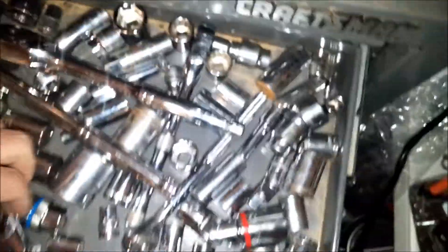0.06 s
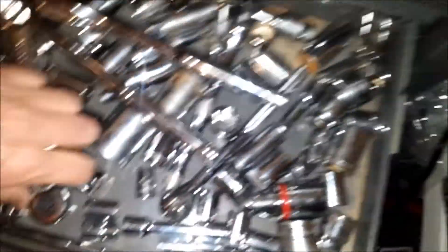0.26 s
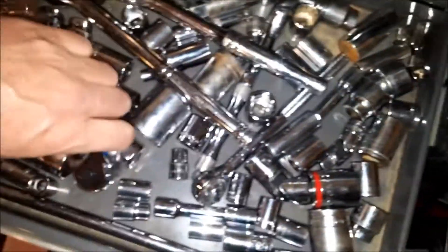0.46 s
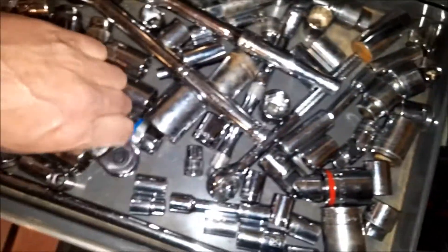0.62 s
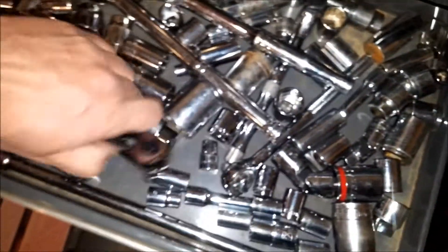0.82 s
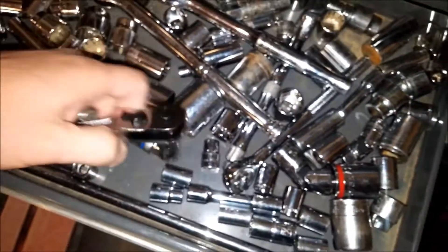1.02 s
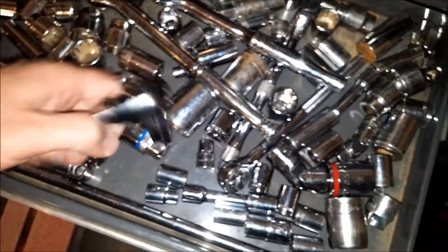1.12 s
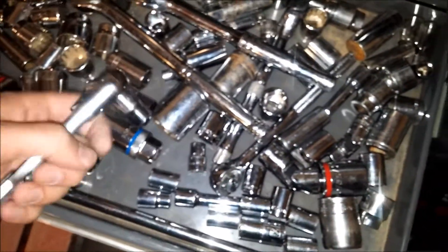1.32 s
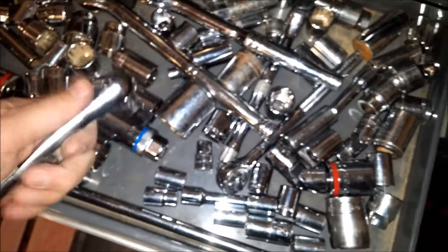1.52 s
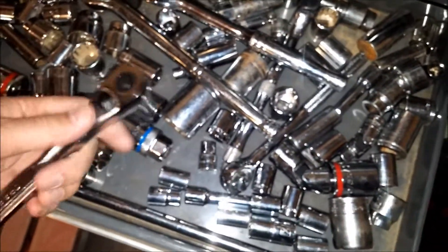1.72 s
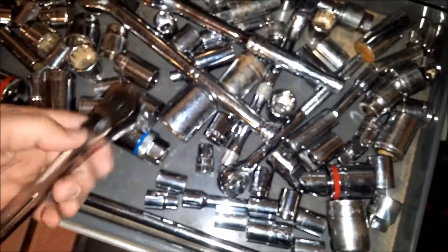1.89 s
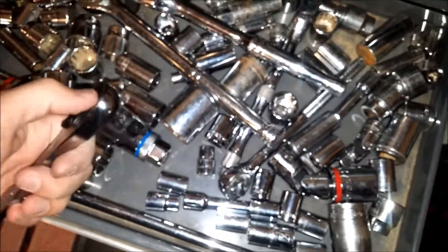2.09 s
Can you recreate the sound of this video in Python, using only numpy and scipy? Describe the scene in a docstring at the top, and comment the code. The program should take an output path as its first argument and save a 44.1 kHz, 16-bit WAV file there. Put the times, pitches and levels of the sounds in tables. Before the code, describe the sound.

Steel sockets clink and clatter as a hand rummages in a toolbox drawer, then faint ticks.

```python
"""A hand rummages among steel sockets in a toolbox drawer and pulls out a ratchet handle.
For the first second the pile scrapes in tiny slips and clacks, ringing the drawer floor and a long bar.
At 0.4 s a heavy knock thumps the case and a large socket pings; a small one pings at 0.7 s.
From 1.1 s the lifted handle slides through the hand, ticking faintly, its loose head chattering.
Throughout, a small garage rings briefly over faint rumble and hiss."""
import sys
import numpy as np
from scipy import signal
from scipy.fft import rfft, irfft, next_fast_len
from scipy.io import wavfile
from scipy.ndimage import uniform_filter1d

SR = 44100
rng = np.random.default_rng(int(sys.argv[2]) if len(sys.argv) > 2 else 0)


def write(x):
    x = np.atleast_2d(x).T
    wavfile.write(sys.argv[1], SR, np.round(np.clip(x, -1, 1) * 32767).astype(np.int16))


N = 94815
TIME_S = np.arange(N) / SR
CUTOFF_HZ, SLIP_SPREAD_DB = 15900, 5.5

# ratchet handle modes: f/Hz, level/dB, t60/s
HANDLE_MODES = [(2910, -11, .1), (3130, -13, .09), (3270, -11, .08), (3945, -10, .05), (4197, 0, .08),
                (4340, -11, .07), (5670, -15, .08), (5890, -15, .08), (8010, -5, .03), (8112, -1, .095),
                (9119, -15, .05)]
# envelope of the handle sliding in the hand: t/s, level/dB
SLIDE_ENVELOPE = [(1.101, -70.5), (1.23, -73.5), (1.249, -57.5), (1.301, -70), (1.34, -78), (1.53, -74),
                  (1.597, -55.5), (1.63, -83), (1.692, -74.5), (1.719, -46.5), (1.8, -78.5), (1.86, -65.5),
                  (1.91, -83), (2.08, -75), (2.14, -68.5)]


def from_db(db):
    """Decibels to gain."""
    return 10 ** (np.asarray(db) / 20)


def at_hz(points, hz):
    """Interpolate a table over log frequency."""
    table_hz, values = np.transpose(points)
    return np.interp(np.log(np.maximum(hz, 1)), np.log(table_hz), values)


def rfft_hz(size):
    """FFT bin frequencies."""
    return np.arange(size // 2 + 1) * SR / size


def filtered(x, gain):
    """Apply gain(hz) to the spectrum."""
    size = next_fast_len(N + SR // 4)
    return irfft(rfft(x, size) * gain(rfft_hz(size)), size)[..., :N]


def stereo_pair(mid, side, hz):
    """Left and right from two independent parts, alike in the bass, less so higher up."""
    # left-right likeness: f/Hz, correlation
    likeness = [(600, .95), (1200, .8), (3000, .1), (12000, .17)]
    correlation = at_hz(likeness, hz)
    mid = mid * np.sqrt((1 + correlation) / 2)
    side = side * np.sqrt((1 - correlation) / 2)
    return np.array([mid + side, mid - side])


def room_air(rms_db=-66.5):
    """Steady rumble and hiss."""
    # noise spectrum: f/Hz, relative density/dB
    density = [(25, -18.5), (48, -6), (110, -0.5), (170, -3.5), (260, -6.5), (600, -12.5), (1230, -14),
               (2840, -17), (4250, -21), (6400, -22), (9000, -26.5), (15500, -27)]
    hz = rfft_hz(N)
    white = stereo_pair(*rfft(rng.standard_normal((2, N))), hz)
    noise = irfft(white * from_db(at_hz(density, hz)), N)
    return from_db(rms_db) * noise / noise.std()


def garage_reverb(x, t60_s=0.45, build_s=0.012, level_db=-21.5):
    """Diffuse reflections build quickly and die away."""
    # tail spectrum: f/Hz, level/dB
    colour = [(170, 12.5), (500, -6.5), (1200, 0.5), (3000, -0.5), (7000, -5.5), (14000, -8)]
    envelope = from_db(-60 * TIME_S / t60_s) * (1 - np.exp(-TIME_S / build_s))
    tail = rng.standard_normal((2, N)) * envelope
    tail /= np.sqrt(np.sum(tail ** 2) / 2)
    tail = filtered(tail, lambda hz: from_db(level_db + at_hz(colour, hz)))
    return signal.fftconvolve(x, tail, axes=1)[:, :N]


def drawer_direction(hz, left_lead_s=0.00016, lead_top_hz=1450):
    """Complex left and right gains for a source a little to the left."""
    # balance: f/Hz, left minus right/dB
    balance = [(200, 2.5), (700, -0.5), (1300, 1.5), (2400, 0), (5500, -1.5), (7200, 1), (9300, -12),
               (11500, -6), (13000, -0.5)]
    split = np.array([[0.5], [-0.5]])
    phase_rad = 2 * np.pi * np.minimum(hz, lead_top_hz) * left_lead_s
    return from_db(split * at_hz(balance, hz)) * np.exp(1j * split * phase_rad)


def struck(hits, modes, spread_db=1.5):
    """Blows (t/s, level/dB, optional tilt/dB per octave) ring damped modes, a bit differently each time."""
    hit_s, hit_db, *tilt = np.transpose(hits)
    starts = (hit_s * SR).astype(int)
    octaves = np.log2(np.array(modes)[:, 0])
    scatter_db = spread_db * rng.standard_normal((len(hit_s), len(modes)))
    out = 0
    for k, (hz, mode_db, t60_s) in enumerate(modes):
        tilt_db = sum(tilt) * (octaves[k] - octaves.mean())
        force = np.bincount(starts, from_db(hit_db + mode_db + tilt_db + scatter_db[:, k]), N)[:N]
        radius, step_rad = from_db(-60 / (t60_s * SR)), 2 * np.pi * hz / SR
        poles = [1, -2 * radius * np.cos(step_rad), radius ** 2]
        out += (-1) ** k * signal.lfilter([0, np.sin(step_rad)], poles, force + 1e-18)
    return out


def pile_modes(count=700, rise_s=0.00024, crack_s=0.003, crack_db=-10):
    """Crowded modes of touching sockets: frequencies and waveforms, each a crack, then a short ring."""
    # pile decay: f/Hz, t60/s
    decay_times = [(400, 0.053), (1500, 0.075), (4000, 0.1), (11000, 0.079)]
    t = TIME_S[:SR // 7]
    hz = np.linspace(100, CUTOFF_HZ, count) + rng.uniform(-10, 10, count)
    t60_s = at_hz(decay_times, hz) * np.exp(0.12 * rng.standard_normal(count))
    attack = (1 + from_db(crack_db) * np.exp(-t / crack_s)) * (1 - np.exp(-t / rise_s))
    decay = from_db(-60 * np.outer(1 / t60_s, t))
    rings = np.cos(2 * np.pi * np.outer(hz, t)) * decay * attack
    return hz, rings.astype(np.float32)


def pile_colour_db(hz, body_db, treble_db):
    """Contacts near the drawer floor have more body, hard ones more treble."""
    # pile spectrum: f/Hz, level/dB
    spectrum = [(120, -11.5), (250, 3), (380, -2), (560, 3), (800, -0.5), (1200, 6), (2000, 0.5),
                (3200, -5), (5000, -4), (7000, -3.5), (10000, 0), (12500, -7.5), (15500, -16)]
    shelves = [(1000, body_db), (2200, 0), (4500, 0), (9000, treble_db)]
    return at_hz(spectrum, hz) + at_hz(shelves, hz)


def contact(hz, rings, colour_db, cluster_spread_db=2.2):
    """One contact drives every mode by a random amount, favouring a few clusters."""
    clusters = uniform_filter1d(rng.standard_normal(len(hz)), size=7)
    favour = from_db(cluster_spread_db * clusters / clusters.std())
    favour /= np.sqrt(np.mean(favour ** 2))
    drive = stereo_pair(*rng.standard_normal((2, len(hz))), hz) * favour * from_db(colour_db)
    return drive.astype(np.float32) @ rings


def scrape(hz, rings, envelope, colour_db, points, slips_per_s=350):
    """Steel slides in tiny slips, shared among several contact points."""
    level = from_db(np.interp(TIME_S, *np.transpose(envelope), left=-np.inf, right=-np.inf))
    out = 0
    for _ in range(points):
        slipping = rng.random(N) < slips_per_s / points / SR
        strength = from_db(SLIP_SPREAD_DB * rng.standard_normal(N).clip(-2, 2))
        force = slipping * strength * rng.choice([-1, 1], N) * level
        out += signal.fftconvolve([force], contact(hz, rings, colour_db), axes=1)[:, :N]
    return out


def handle_slide(hz, rings, level_db=-26):
    """The handle scrapes faintly through the hand."""
    # slide spectrum: f/Hz, level/dB
    colour = [(400, -18.5), (1000, -3.5), (3000, 2.5), (4500, 5), (7000, -2.5), (10000, -9.5),
              (15000, -41.5)]
    return scrape(hz, rings, SLIDE_ENVELOPE, level_db + at_hz(colour, hz), points=4)


def head_chatter(count=300, re_slide_db=-16, tilt_db_per_oct=-13):
    """The loose head of the sliding handle taps the handle's modes."""
    hit_s = rng.uniform(SLIDE_ENVELOPE[0][0], SLIDE_ENVELOPE[-1][0], count)
    hit_db = np.interp(hit_s, *np.transpose(SLIDE_ENVELOPE)) + re_slide_db
    hit_db += SLIP_SPREAD_DB * rng.standard_normal(count).clip(-2, 2)
    return struck(np.column_stack([hit_s, hit_db, np.full(count, tilt_db_per_oct)]), HANDLE_MODES)


def handle_ticks():
    """Single light blows ring the handle."""
    # blows: t/s, level/dB, tilt/dB per octave
    hits = [(.613, -34, -10.5), (1.0565, -48, -1), (1.2856, -59, -4.5), (1.312, -58, -4),
            (1.581, -49.5, -4), (1.7195, -33.5, 5.5), (1.7235, -44.5, 5), (1.748, -61, -9),
            (1.779, -54, -6), (1.858, -53, -12), (2.129, -70, -8)]
    return struck(hits, HANDLE_MODES)


def pile_shift(hz, rings, level_db=-23):
    """Sockets slide over each other."""
    # sliding envelope: t/s, level/dB
    envelope = [(0, -47.5), (.05, -53), (0.131, -44.5), (0.156, -58.5), (0.192, -53), (0.213, -33.5),
                (.3, -36), (.4, -41), (.52, -44.5), (.56, -57), (.64, -49.5), (.77, -45), (0.821, -56.5),
                (.98, -59), (1.101, -74)]
    colour_db = level_db + pile_colour_db(hz, body_db=0.5, treble_db=-14)
    return scrape(hz, rings, envelope, colour_db, points=8)


def rocking_bar():
    """A long bar rocks on the pile and rings."""
    # bar modes: f/Hz, level/dB, t60/s
    modes = [(883, 2, .083), (1260, -10, .09), (1563, -7.5, .11), (1666, -10, .2), (2050, -12, .25)]
    # blows: t/s, level/dB
    hits = [(.0275, -36), (.4145, -29), (.7135, -34.5), (.765, -43), (.831, -43), (.929, -45.5),
            (1.032, -52)]
    return struck(hits, modes)


def socket_pings():
    """A small and a large socket, free to ring, sound their own few modes."""
    # socket modes: f/Hz, level/dB, t60/s
    small_modes = [(9855, -9, .055), (11400, -6, .03), (11505, -32, .33), (11548, 1, .058),
                   (11640, -17, .1), (11740, -21, .22), (12800, -17, .025)]
    large_modes = [(3500, -11, .06), (6056, -15, .07), (8050, -1, .05), (10790, -1, .035), (12300, -26, .3),
                   (13170, -25, .25), (13215, -26, .2), (14100, -25, .13), (15230, -27, .24)]
    # blows: t/s, level/dB
    small_hits = [(.7133, -9.5), (.7255, -16), (.8855, -39.5)]
    large_hits = [(.3365, -15), (.344, -32.5), (.4145, -21)]
    return struck(small_hits, small_modes) + struck(large_hits, large_modes)


def case_thumps():
    """Heavy knocks flex the toolbox case."""
    # case modes: f/Hz, level/dB, t60/s
    modes = [(75, -16, .08), (185, -18, .035), (355, -4, .02), (498, -5.5, .04), (665, -10.5, .04),
             (925, -7.5, .042), (1200, -13, .05)]
    # heavy knocks: t/s, level/dB
    hits = [(.261, -31), (.3365, -25), (.393, -31), (.409, 0), (.613, -29)]
    return struck(hits, modes)


def pile_knocks(hz, rings, pile_db=-19, floor_db=-11, heavy_db=-13, bass_db_per_db=0.6):
    """Each knock rings the pile and the drawer floor; only heavy ones bring out the bass."""
    # steel on steel: t/s, level/dB, relative body/dB, relative treble/dB
    knocks = [(0.0271, -31, 5.5, -7.5), (0.0735, -31.5, -7, -3), (0.086, -47, 8, -16),
              (0.111, -35.5, -29, -13), (0.13, -45.5, -16, -0.5), (0.223, -24, 4, -16.5),
              (0.251, -29, -2, -10), (0.261, -27.5, 2, -7), (0.293, -23.5, -13.5, -17.5),
              (0.297, -27.5, -1, -20), (0.32, -27.5, 4, -11), (0.3363, -21.5, -2.5, -2),
              (0.37, -29, 9, -15), (0.392, -40.5, 18, 3), (0.408, -21.5, 14, 3), (0.414, -7.5, -8.5, -10.5),
              (0.522, -32.5, 6, -16), (0.582, -40, 5, -21), (0.614, -31, 10, -4), (0.616, -21.5, -28, -14),
              (0.648, -37, 11, 0.5), (0.678, -24.5, 7.5, -15), (0.7143, -20, -4, -9.5),
              (0.736, -27, -3.5, -15), (0.76, -27.5, 0.5, -34), (0.831, -40.5, 7, -14),
              (0.8861, -38.5, -23, -23), (0.928, -42.5, -10, -7), (0.969, -35.5, -33, -12),
              (1.031, -54, -0.5, -15.5), (1.042, -52, 2, -11), (1.0569, -49, -14, -3),
              (1.312, -54.5, -31, -10), (1.548, -52.5, -22, -18.5), (1.582, -47.5, -34, -10),
              (1.72, -47, -16.5, -2.5), (1.779, -49, -28, -16), (1.828, -54, -28, -11),
              (1.852, -58.5, -25, -0.5), (2.126, -52.5, -9.5, -18)]
    # sheet-metal floor modes: f/Hz, level/dB, t60/s
    floor_modes = [(556.1, 1, .085), (645, 1.5, .08), (927, 0, .082), (1080, -4, .08), (1205, 1, .09),
                   (1390, -8.5, .09), (1640, -4.5, 0.096), (2053, -3, .09), (2195, -4, .06),
                   (2880, -7.5, .1), (3030, -6.5, .1)]
    pile, floor_hits = np.zeros((2, N + SR)), []
    for hit_s, hit_db, body_db, treble_db in knocks:
        bass_db = at_hz([(300, bass_db_per_db * (hit_db - heavy_db)), (650, 0)], hz)
        colour_db = pile_db + hit_db + bass_db + pile_colour_db(hz, body_db, treble_db)
        start = int(hit_s * SR)
        pile[:, start:start + rings.shape[1]] += contact(hz, rings, colour_db)
        floor_hits.append((hit_s, floor_db + hit_db + body_db))
    return pile[:, :N] + struck(floor_hits, floor_modes)


def scene():
    """The drawer, close by in the garage; its thin floor radiates no deep bass."""
    hz, rings = pile_modes()
    steel = pile_knocks(hz, rings) + case_thumps()
    steel += handle_ticks() + socket_pings() + rocking_bar() + head_chatter()
    steel += pile_shift(hz, rings) + handle_slide(hz, rings)
    steel = signal.sosfilt(signal.butter(2, 190, "high", fs=SR, output="sos"), steel)
    return filtered(steel + garage_reverb(steel), drawer_direction) + room_air()


def record(dry):
    """Clip at full scale, then low-pass steeply."""
    lowpass = signal.cheby2(12, 50, CUTOFF_HZ + 600, fs=SR, output="sos")
    return signal.sosfiltfilt(lowpass, np.clip(dry, -1, 1))


dry = scene()
out = record(dry)
write(out)
```